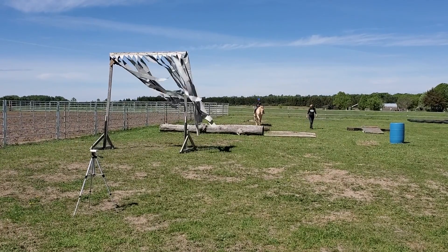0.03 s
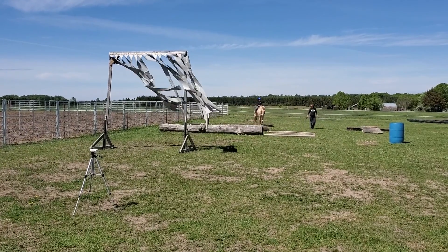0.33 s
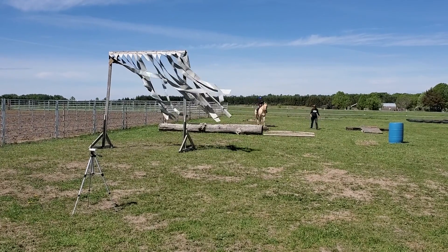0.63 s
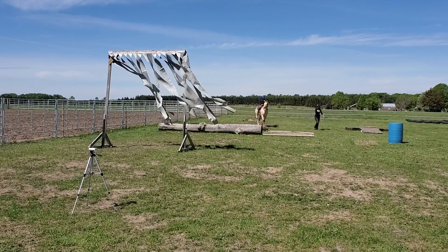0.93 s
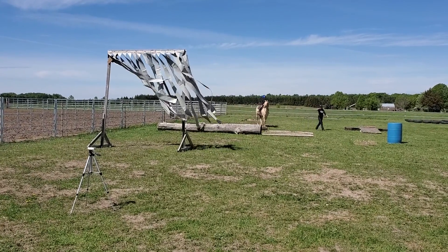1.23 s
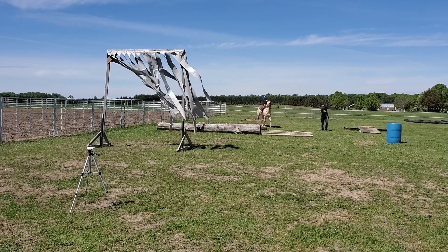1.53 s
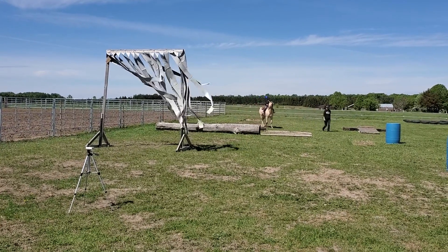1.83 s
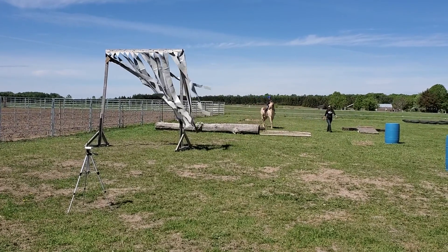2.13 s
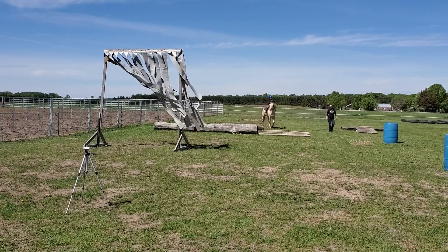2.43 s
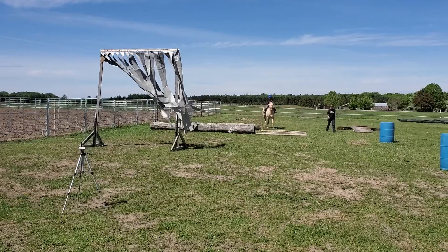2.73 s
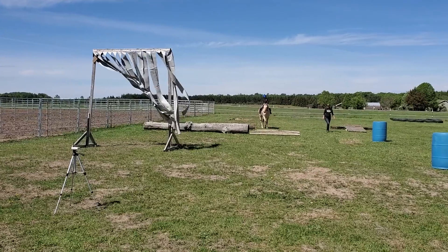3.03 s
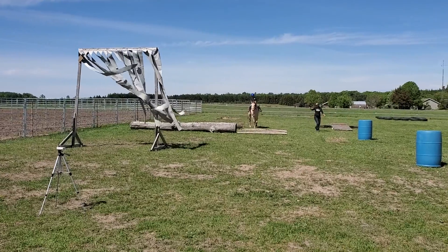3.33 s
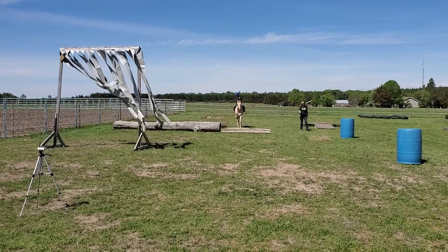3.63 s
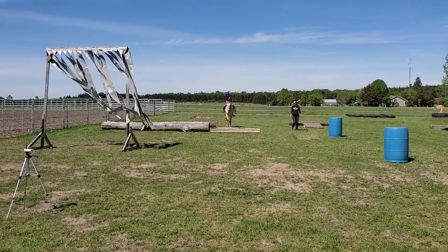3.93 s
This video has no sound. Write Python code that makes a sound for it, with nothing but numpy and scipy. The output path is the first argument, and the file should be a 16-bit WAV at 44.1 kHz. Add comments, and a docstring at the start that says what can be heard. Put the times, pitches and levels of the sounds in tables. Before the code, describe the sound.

A horse whinnies in an open field. Wind thumps on the microphone and plastic streamers rustle faintly, then the high call rises, quavers, turns deeper and hoarse, and ends in a fluttering blow through the nostrils.

```python
"""Whinny across a windy field

A horse's high whistle rises, holds, then quavers ever deeper and turns hoarse as a second, lower
voice joins; the call ends in a fluttering blow through the nostrils. Wind buffets the microphone
ports and plastic streamers rustle and tick. Behind them: two soft swishes and a distant bird."""
import sys
import numpy as np
from scipy import signal
from scipy.fft import rfft, irfft, next_fast_len
from scipy.io import wavfile
from scipy.ndimage import map_coordinates

SR = 44100
rng = np.random.default_rng(int(sys.argv[2]) if len(sys.argv) > 2 else 0)


def master(y):
    """Save y as 16-bit WAV."""
    cut = np.clip(np.atleast_2d(y).T, -1, 1)
    pcm = np.round(cut * 32767)  # scale
    wavfile.write(sys.argv[1], SR, pcm.astype(np.int16))


N = 176400
T = np.arange(N) / SR

# Hush of the field: freq_hz, gain_db
FIELD_EQ = [(200, -15), (1000, -18.5), (2750, -31), (4750, -38.5), (15500, -73)]
# Distant bird notes: start_s, start_pitch_hz, level_db
BIRD_NOTES = [(3.771, 1860, -55), (3.82, 2260, -59)]
# Short bright swishes: peak_s, level_db
SWISH_CUES = [(.61, -61.5), (3.11, -54)]
# Their airy top: freq_hz, gain_db
SWISH_EQ = [(3000, -39), (8500, 1.5), (14500, 0)]

# Swell of the streamers' rustle: time_s, level_db
RUSTLE_LEVEL = [(0, -58.5), (.3, -60.5), (.6, -66.5), (1.2, -72.5), (4, -69.5)]
# Colour of rustling plastic: freq_hz, gain_db
RUSTLE_EQ = [(500, 7.5), (3000, 4), (5200, 0.5), (8000, -10.5), (15000, -23.5)]
# Streamer ticks: start_s, level_db
TICK_CUES = [(0.12, -46.5), (0.345, -36.5), (3.756, -53.5)]
# Snap of a tick: freq_hz, gain_db
TICK_EQ = [(500, -8), (2000, 0.5), (5000, 3), (8000, -9), (15000, -22.5)]

# Swell of the wind rumble: time_s, gain_db
RUMBLE_SWELL = [(0, -24.5), (.3, -32), (.55, -30), (.72, -31.5), (1.45, -35), (1.8, -29.5), (2.05, -35),
                (2.2, -33.5), (2.95, -31.5), (3.12, -41.5), (3.27, -38.5), (3.45, -38.5), (3.6, -50),
                (3.75, -44.5), (4, -45)]
# Where the rumble leans: time_s, left_minus_right_db
RUMBLE_PAN = [(2.95, -2.5), (3.15, 8)]
# Weight of the rumble: freq_hz, gain_db
RUMBLE_EQ = [(20, -19), (40, -7), (65, 1.5), (90, -3), (175, -8), (300, -14.5), (600, -26), (900, -30),
             (3000, -71.5)]
# Buffets on the ports: start_s, body_gain_db, thud_gain_db
BUFFET_CUES = [(0.055, -32, -12), (0.162, -40, -20), (0.279, -25, -20.5), (0.346, -26, -13.5),
               (0.365, -19, -38), (0.462, -23.5, -27), (0.67, -25.5, -18), (0.84, -25.5, -24),
               (0.878, -18.5, -15), (0.915, -17, -8), (1.051, -35, -44), (1.296, -32.5, -16.5),
               (1.364, -27.5, -21.5), (1.47, -29, -17), (1.605, -22.5, -27), (1.94, -24.5, -18.5),
               (1.969, -18, -37), (2.0, -13, -27), (2.33, -22.5, -12.5), (2.4, -23, -12),
               (2.441, -19.5, -11), (2.469, -22.5, -18), (2.692, -18.5, -30), (2.911, -16, -10.5),
               (2.965, -22.5, -15.5), (3.351, -42, -19.5), (3.382, -36, -21.5)]
# A buffet's low thud: freq_hz, gain_db
THUD_EQ = [(20, -22.5), (50, -7.5), (85, 0.5), (170, -10), (300, -14.5), (700, -48.5), (2000, -109)]
# A buffet's tearing body: freq_hz, gain_db
BODY_EQ = [(60, -13.5), (200, 3.5), (400, 0.5), (800, -1.5), (1300, -14), (2200, -26.5), (4000, -47.5),
           (8000, -69), (15000, -74.5)]

# Nasal resonances: centre_hz, width_hz, gain_db
NASAL_RINGS = [(2357, 60, 0.5), (3143, 61, 1), (3595, 110, -1.5), (4170, 160, -1), (7600, 450, -4.5)]
# Closing blow of air: time_s, level_db
SNORT_LEVEL = [(3.0, -92), (3.08, -44.5), (3.2, -49.5), (3.33, -51.5), (3.41, -54.5), (3.45, -68),
               (3.65, -91)]
# Colour of the nostrils: freq_hz, gain_db
NOSTRIL_EQ = [(400, -3), (1300, -1.5), (3300, -6.5), (5500, -20), (11000, -21.5), (15500, -36)]
# Hoarse layers: time_s, low_voice_db, air_db
HOARSE_LEVELS = [(1.22, -110, -100), (1.3, -98, -57.5), (1.6, -72.5, -53.5), (1.86, -60, -54),
                 (2.02, -37.5, -37.5), (2.3, -37.5, -42), (2.52, -38, -37), (2.68, -36.5, -31.5),
                 (2.86, -31, -32.5), (2.89, -37, -43.5), (2.94, -29, -34.5), (2.985, -55.5, -40.5),
                 (3.03, -49.5, -31.5), (3.1, -55.5, -48), (3.2, -130, -110)]
# Formants of throat and nose: freq_hz, gain_db
THROAT_EQ = [(200, -56), (700, -1), (1050, -19), (1450, 4.5), (1950, -4.5), (2650, 2), (3200, 2),
             (3900, -7), (4600, -21.5), (6300, -20.5), (8000, -30), (11000, -24.5), (15500, -34)]
# Side tone between the whistle's harmonics: time_s, level_db, gap_fraction
SIDE_PATH = [(1.48, -73.5, 0.63), (1.6, -46.5, 0.53), (1.68, -60, .5), (1.77, -54, 0.53),
             (1.82, -44.5, 0.52), (1.92, -47.5, 0.45), (2.03, -38, .43), (2.3, -41.5, 0.37),
             (2.6, -36.5, 0.5), (2.75, -34, 0.5), (2.93, -59.5, 0.47), (3.07, -120, 0.69)]
# Its partials: harmonic_below, gain_db
SIDE_PARTIALS = [(1, -2.5), (2, -13.5), (3, -18), (4, -26.5)]
# Melody along the whistle's crests: time_s, pitch_hz
CREST_PITCH = [(1.33, 982), (1.36, 1155), (1.40, 1412), (1.44, 1545), (1.48, 1658), (1.55, 1721),
               (1.62, 1745), (1.77, 1743), (1.84, 1779), (1.97, 1810), (2.15, 1774), (2.26, 1723),
               (2.45, 1729), (2.54, 1718), (2.63, 1689), (2.84, 1524), (2.93, 1352), (3.05, 1135)]
# Quavers below that melody: lowest_point_s, drop_hz
QUAVER_DIPS = [(1.82, 11), (1.915, 64), (2.012, 92), (2.108, 70.6), (2.205, 75), (2.295, 70), (2.39, 57),
               (2.487, 111.5), (2.582, 128), (2.683, 210), (2.787, 278), (2.885, 220), (2.985, 164),
               (3.09, 145)]
# Harmonic mix of the whistle: time_s, fundamental_db, octave_db, third_db, overtones_db
WHISTLE_LEVELS = [(1.22, -135, -130, -130, -140), (1.35, -55.5, -56.5, -57, -73),
                  (1.41, -41.5, -40.5, -54, -67.5), (1.48, -39.5, -55, -62.5, -67.5),
                  (1.55, -33.5, -39.5, -67, -59), (1.62, -32.5, -43, -66, -53),
                  (1.69, -32.5, -57, -57, -62.5), (1.85, -31.5, -53, -52.5, -73),
                  (1.97, -30.5, -37, -57.5, -55.5), (2.15, -30, -40, -56.5, -63.5),
                  (2.42, -31, -36, -56, -56), (2.58, -32.5, -33, -52, -60), (2.73, -33.5, -28, -38, -52),
                  (2.85, -33.5, -30.5, -42.5, -50), (2.94, -40, -38, -39, -59.5),
                  (2.99, -30, -41, -66, -78.5), (3.07, -130, -130, -130, -130)]
# Its upper overtones: harmonic, gain_db
UPPER_HARMONICS = [(4, 2), (5, -3), (6, -7.5)]
# Air forced past the whistle: freq_hz, gain_db
HISS_EQ = [(3000, -27), (5500, 6), (9000, -6), (13000, 2), (15500, -2.5)]
# The call's phase between the two ports: freq_hz, left_lead_rad
PORT_LEAD = [(0, 0), (3450, -1.48), (7670, -1.46), (15800, -3)]


def amp(db):
    """Decibels to gain."""
    return 10 ** (np.asarray(db) / 20)


def unit(x):
    """Scale to rms 1."""
    return x / np.sqrt(np.mean(x ** 2) + 1e-20)


def curves(rows):
    """One automation curve for each column after the time."""
    times, *columns = np.transpose(rows)
    return [np.interp(T, times, column) for column in columns]


def wobble(rate):
    """A smooth random curve, rate knots a second."""
    return map_coordinates(rng.standard_normal(int(N * rate / SR) + 4), [T * rate])


def filtered(x, response):
    """Filter x by a function of frequency."""
    size = next_fast_len(N + 8192)
    return irfft(rfft(x, size) * response(np.fft.rfftfreq(size, 1 / SR)), size)[..., :N]


def coloured(x, eq):
    """x through an EQ curve, at rms 1."""
    freq_hz, gain_db = np.transpose(eq)
    return unit(filtered(x, lambda hz: amp(np.interp(np.log(hz + 1), np.log(freq_hz), gain_db))))


def noise(eq):
    """Wide coloured noise, unrelated left and right."""
    return coloured(rng.standard_normal((2, N)), eq)


def hit(peak_s, attack_s, decay_s):
    """Envelope that swells to a peak and dies away."""
    return np.exp(-np.maximum(peak_s - T, 0) / attack_s - np.maximum(T - peak_s, 0) / decay_s)


def phase_of(hz):
    """Running phase of a pitch curve."""
    return 2 * np.pi * np.cumsum(hz) / SR


def partial(phase, db, shimmer_db):
    """One sine whose level shimmers."""
    return 2 ** .5 * amp(db + shimmer_db * wobble(45)) * np.sin(phase)


def field(level_db=-62):
    """The steady hush of open ground."""
    return amp(level_db) * noise(FIELD_EQ)


def bird(rise_hz_per_s=2600, swell_s=0.013):
    """Two faint rising notes far away, the second higher."""
    notes = np.zeros(N)
    for start_s, hz, db in BIRD_NOTES:
        age = np.maximum(T - start_s, 0)
        envelope = age / swell_s * np.exp(1 - age / swell_s)
        notes += amp(db) * envelope * np.sin(phase_of(hz + rise_hz_per_s * age + 40 * wobble(290)))
    return notes


def swishes(width_s=0.054):
    """Two soft swishes, high in the treble."""
    return sum(amp(db) * np.exp(-((T - s) / width_s) ** 2) for s, db in SWISH_CUES) * noise(SWISH_EQ)


def streamers():
    """Plastic strips rustle in the wind, with a few sharp ticks."""
    level_db, = curves(RUSTLE_LEVEL)
    rustle = amp(level_db + 3.2 * wobble(120)) * noise(RUSTLE_EQ)
    ticks = sum(amp(db) * hit(s + 0.00059, attack_s=0.00061, decay_s=0.0035) for s, db in TICK_CUES)
    return rustle + ticks * noise(TICK_EQ)


def wind(rumble_db=2, thud_db=-5, body_db=-3, rise_s=0.0045, attack_s=0.0068):
    """A lumpy rumble at each port; every buffet adds a thud and a brighter, tearing body."""
    lumps = lambda depth_db, rate: unit(amp(depth_db * np.array([wobble(rate), wobble(rate)])))
    (swell_db,), (pan_db,) = curves(RUMBLE_SWELL), curves(RUMBLE_PAN)
    port_gains = amp(swell_db + rumble_db + np.array([pan_db, -pan_db]) / 2)
    rumble = port_gains * noise(RUMBLE_EQ) * lumps(depth_db=5.5, rate=55)
    thuds = [amp(db) * hit(s + rise_s, attack_s, decay_s=0.025) for s, _, db in BUFFET_CUES]
    bodies = [amp(db) * hit(s + rise_s / 2, attack_s / 2, decay_s=0.017) for s, db, _ in BUFFET_CUES]
    thud = np.linalg.norm(thuds, axis=0) * noise(THUD_EQ)  # overlapping buffets add in power
    body = np.linalg.norm(bodies, axis=0) * noise(BODY_EQ) * lumps(depth_db=4, rate=260)
    return rumble + amp(thud_db) * thud + amp(body_db) * body


def nasal(x, waver_db, ring_db=0):
    """x plus the ringing of the nasal passages, each resonance swelling on its own."""
    ringing = np.zeros(N)
    for centre, width, db in NASAL_RINGS:
        ring = filtered(x, lambda hz: 1j * hz * width / (centre ** 2 - hz ** 2 + 1j * hz * width))
        ringing += amp(db + ring_db + waver_db * wobble(45)) * ring
    return unit(x + ringing)


def snort(flutter_hz=42.1, puff_fall_db=13):
    """The last air leaves in uneven flaps of the nostrils, each puff ringing the nasal passages."""
    level_db, = curves(SNORT_LEVEL)
    flap_cycle = np.cumsum(flutter_hz * (1 + 0.22 * wobble(30))) / SR % 1
    puffs = rng.standard_normal(N) * amp(-puff_fall_db * flap_cycle)
    return amp(level_db) * nasal(coloured(puffs, NOSTRIL_EQ), waver_db=4, ring_db=3)


def hoarseness(whistle_phase, dip, low_hz=242.2, low_rise_hz=76.2, dip_boost_db=2, chop=0.7):
    """The low voice chops the whistle into sidebands and pulses the air rushing through the throat."""
    low_db, air_db = curves(HOARSE_LEVELS)
    low_phase = phase_of((low_hz + low_rise_hz * dip) * (1 + 0.0349 * wobble(130)))
    sidebands = np.zeros(N)
    for harmonic in range(1, 10):
        for order in (-3, -2, -1, 1, 2):
            gain = amp(3 * abs(order) + 7.3 * wobble(40))
            drift = rng.uniform(0, 2 * np.pi) + 0.23 * wobble(65)
            sidebands += gain * np.sin(harmonic * whistle_phase + order * low_phase + drift)
    throat = lambda x: nasal(coloured(x, THROAT_EQ), waver_db=1)
    air = throat(rng.standard_normal(N) * (1 + chop * np.sin(low_phase)))
    return amp(low_db + dip_boost_db * dip) * throat(sidebands) + amp(air_db) * air


def side_tone(whistle_phase, pitch_hz, wander_hz=16):
    """Unsteady partials about midway between the whistle's harmonics."""
    level_db, gap_fraction = curves(SIDE_PATH)
    offset = phase_of(pitch_hz * gap_fraction + wander_hz * wobble(260))
    return sum(partial(k * whistle_phase + offset, level_db + db, shimmer_db=4)
               for k, db in SIDE_PARTIALS)


def whistle(phase, pitch_hz, strain, nose_hz=3264, nose_half_width_hz=73, nose_db=9, hiss_db=-8):
    """The high voice, with rasp and forced air on top; a nose resonance lights up the passing octave."""
    first_db, octave_db, third_db, upper_db = curves(WHISTLE_LEVELS)
    octave_db += nose_db / (1 + ((2 * pitch_hz - nose_hz) / nose_half_width_hz) ** 2)
    rasp = lambda: (0.54 + strain) * wobble(500)
    tone = partial(phase, first_db, shimmer_db=1.2)
    tone += partial(2 * phase, octave_db, shimmer_db=3)
    tone += partial(3 * phase + rasp() / 2, third_db, shimmer_db=4)
    tone += sum(partial(k * phase + rasp(), upper_db + db, shimmer_db=4.5) for k, db in UPPER_HARMONICS)
    hiss = amp(upper_db + hiss_db + 3 * wobble(35)) * coloured(rng.standard_normal(N), HISS_EQ)
    return tone + hiss


def quaver(rounding=.3):
    """The shake of the call, in arches: 1 in each dip, 0 on each crest."""
    cycle = np.interp(T, np.transpose(QUAVER_DIPS)[0], np.arange(len(QUAVER_DIPS)))
    arch = np.hypot(np.sin(np.pi * cycle), rounding)
    return (arch.max() - arch) / np.ptp(arch)


def whinny(fray_start_s=2.606, fray_rise_s=0.36, fray_db=-6, duck_db_per_hz=.012):
    """Two voices in one throat. Late in the call the whistle frays, most of all in the dips."""
    dip, (drop_hz,), (crest_hz,) = quaver(), curves(QUAVER_DIPS), curves(CREST_PITCH)
    pitch_hz = crest_hz - drop_hz * dip
    low_db, _ = curves(HOARSE_LEVELS)
    strain = np.sqrt(amp(low_db - low_db.max()))  # grows with the low voice
    jitter = 0.0027 * wobble(170) + 0.0046 * strain * wobble(900)
    fray = np.clip((T - fray_start_s) / fray_rise_s, 0, 1)
    phase = phase_of(pitch_hz * (1 + jitter)) + 0.59 * fray * (.5 + dip) * wobble(600)
    high = whistle(phase, pitch_hz, strain) + side_tone(phase, pitch_hz)
    high *= amp(fray_db * fray ** 2 * dip)
    hoarse = hoarseness(phase, dip) * amp(wobble(110))
    return (high + hoarse) * amp(-duck_db_per_hz * drop_hz * dip)


def outdoors(call, scatter_db=-11, t60_s=0.288):
    """The call reaches the two ports a little apart, with a brief scatter off the ground and fences."""
    t = np.arange(SR // 2) / SR
    tail = rng.standard_normal((2, len(t))) * amp(-60 * t / t60_s)
    scatter = signal.fftconvolve(call[None], tail / np.linalg.norm(tail[0]), axes=1)[:, :N]
    scatter = filtered(scatter, lambda hz: amp(np.interp(hz, [1700, 3500, 8000], [-5, 0, 5])))
    sides = np.array([[.5], [-.5]])
    lean_db = lambda hz: np.interp(hz, [1710, 2500, 3500, 8030], [2.5, 0, -2.5, -1])
    lead_rad = lambda hz: np.interp(hz, *np.transpose(PORT_LEAD))
    direct = filtered(call, lambda hz: amp(sides * lean_db(hz)) * np.exp(1j * sides * lead_rad(hz)))
    return direct + amp(scatter_db) * scatter


def scene():
    """The horse up front; wind, streamers, swishes and a bird over the hush of the field."""
    return outdoors(whinny() + snort()) + wind() + streamers() + swishes() + bird() + field()


def record(dry, top_hz=15850):
    """A brick-wall high cut on the whole mix."""
    return filtered(dry, lambda hz: hz < top_hz)


dry = scene()
out = record(dry)
master(out)
```